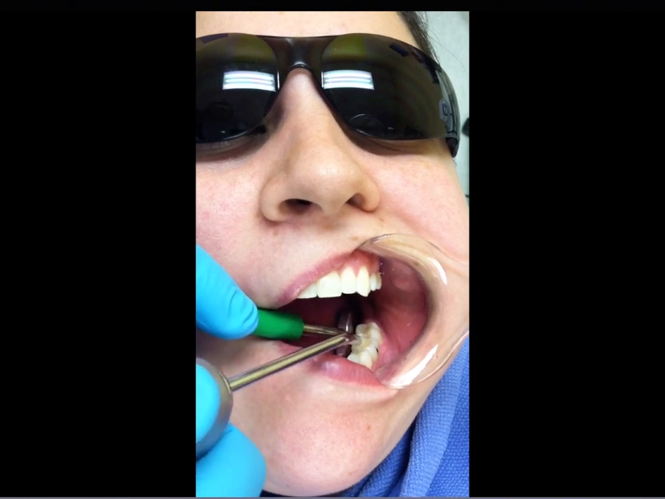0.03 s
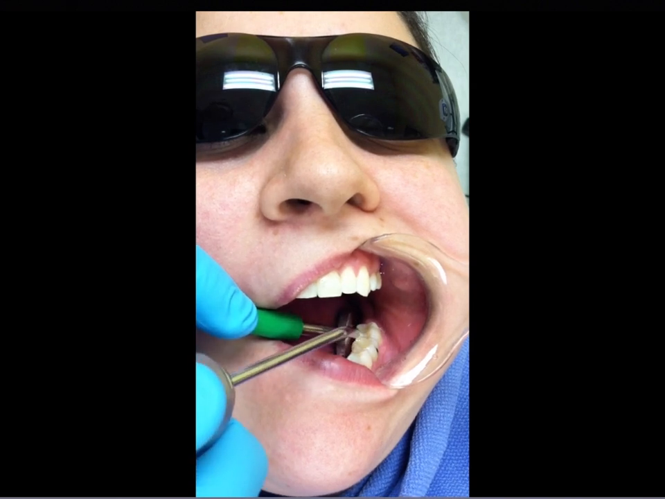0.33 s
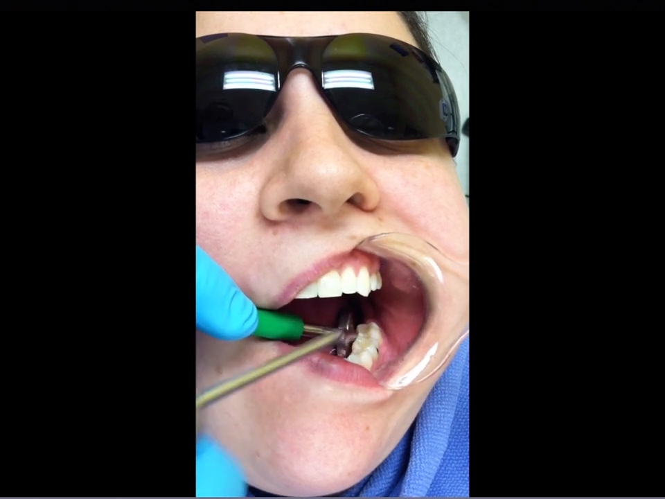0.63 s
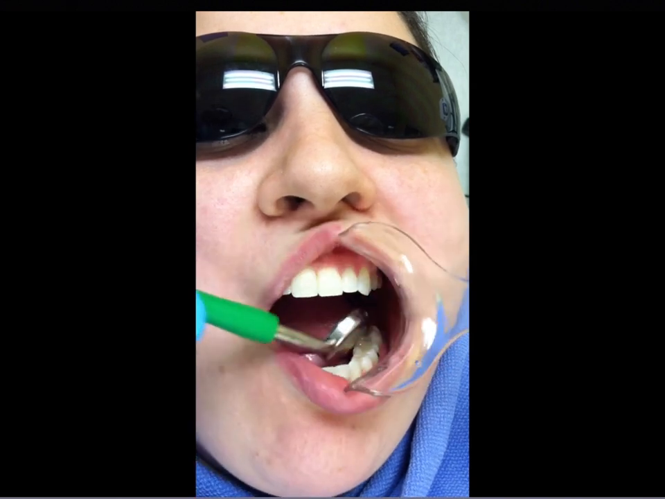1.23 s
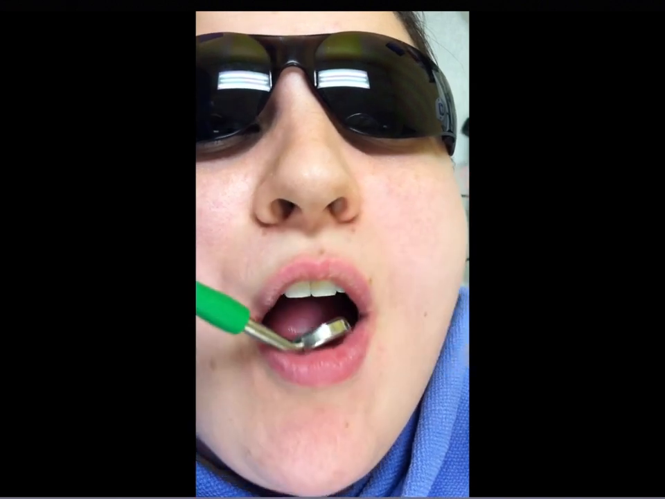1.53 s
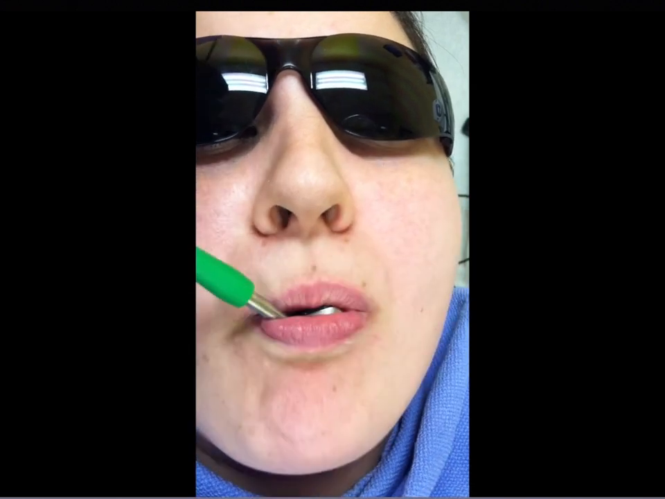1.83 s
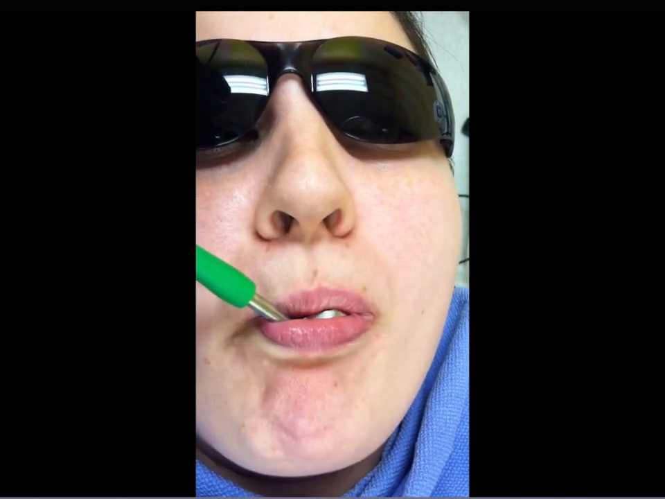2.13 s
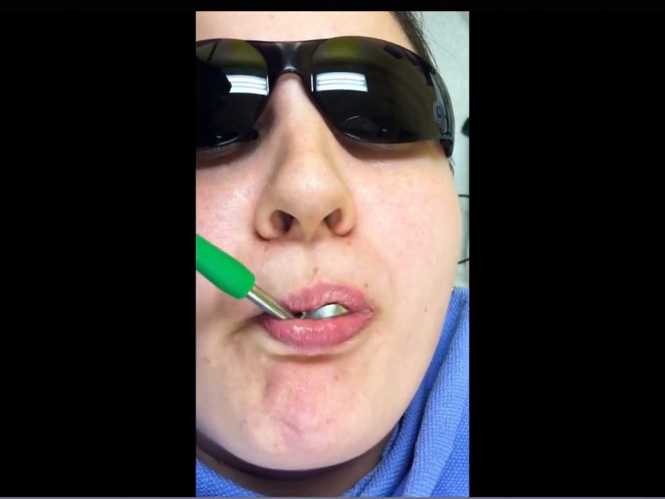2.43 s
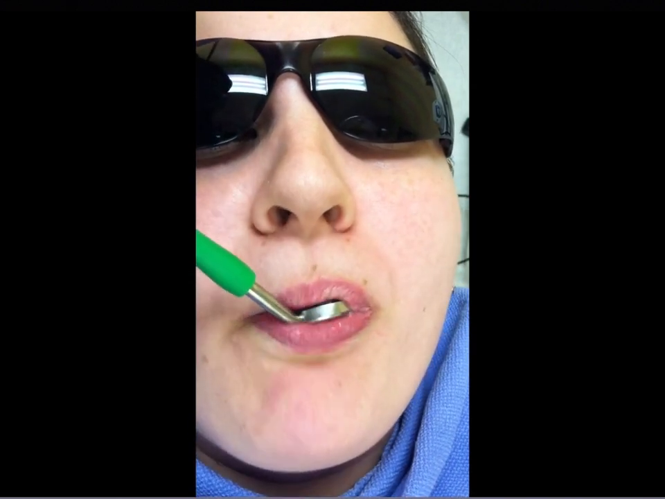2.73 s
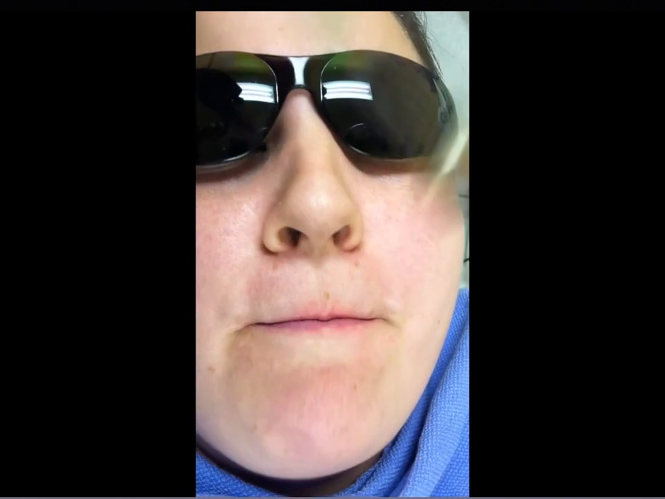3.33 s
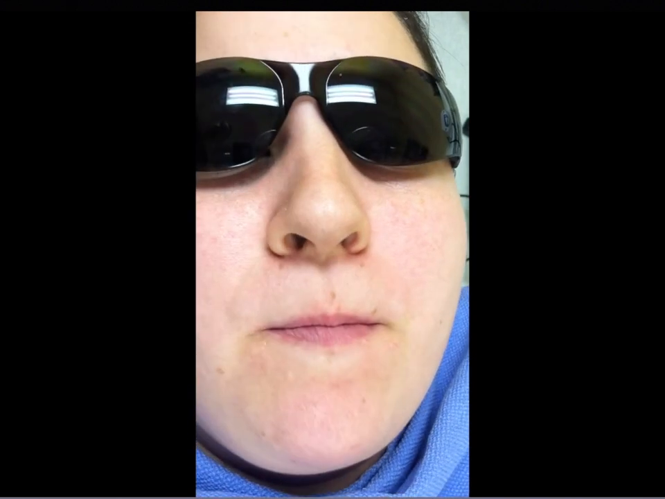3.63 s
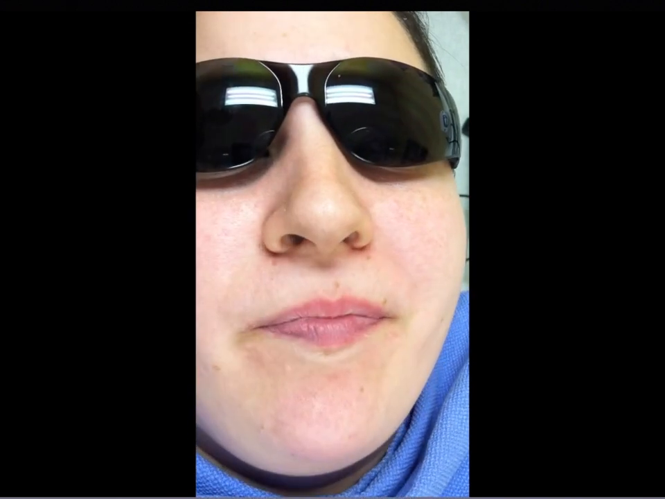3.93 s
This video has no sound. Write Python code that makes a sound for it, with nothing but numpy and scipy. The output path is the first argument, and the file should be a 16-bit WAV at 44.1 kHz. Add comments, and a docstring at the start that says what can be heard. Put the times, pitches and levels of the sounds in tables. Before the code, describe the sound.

A dental suction tip hisses in a mouth, chokes as lips close, then bursts free.

```python
"""Dental suction tip

A suction tip hisses in an open mouth, close by in a small room; at first an air jet blows with it.
The lips close on the tip: the resonances slide down, the flow chokes to leaks, bubbles and a thin
whistle. The seal breaks with a wet burst, and the tip is drawn away to hiss in free air over mains hum."""
import sys
import numpy as np
from scipy import signal
from scipy.fft import rfft, irfft
from scipy.io import wavfile
from scipy.ndimage import uniform_filter1d

SR = 44100
rng = np.random.default_rng(int(sys.argv[2]) if len(sys.argv) > 2 else 0)


def master_out(mix):
    """Clip the mix to full scale and print it as 16-bit PCM to the path in sys.argv[1]."""
    frames = np.transpose(np.atleast_2d(mix))
    ceiling = np.clip(frames, -1, 1)
    pcm = np.round(ceiling * 32767).astype(np.int16)
    wavfile.write(sys.argv[1], SR, pcm)


N = 176400
T = np.arange(N) / SR
FREQS = np.fft.rfftfreq(N, 1 / SR)


def amp(db):
    """Decibels to gain."""
    return 10 ** (np.asarray(db) / 20)


def unit(x):
    """Scales to rms 1."""
    return x / np.sqrt(np.mean(x ** 2) + 1e-20)


def envelope(rows, gate_s=0.0014):
    """Gain from rows of time_s, .., level_db; at either end a gap opens or shuts over gate_s."""
    rows = np.array(rows)
    outside_s = abs(T - np.clip(T, rows[0, 0], rows[-1, 0]))
    gate = np.exp(-np.minimum(outside_s / gate_s, 20))
    return amp(np.interp(T, rows[:, 0], rows[:, -1])) * gate


def pitch(track):
    """Glide from rows of time_s, pitch_hz, level_db."""
    return np.interp(T, *np.transpose(track)[:2])


def wander(rate_hz):
    """Smooth random motion of rms 1, up to the given rate."""
    return unit(irfft(rfft(rng.standard_normal(N)) / (1 + (FREQS / rate_hz) ** 4), N))


def hiss(curve, tone, flutter_db=1., flutter_hz=80):
    """Turbulent air of one colour, fluttering as it drags saliva along."""
    hz, db = np.transpose(tone)
    colour = amp(np.interp(np.log(FREQS + 1), np.log(hz), db))
    colour /= 1 + (hz[0] / 2 / (FREQS + 1)) ** 2  # low cut
    noise = irfft(rfft(rng.standard_normal(N)) * colour, N)
    return envelope(curve) * unit(noise * amp(flutter_db * wander(flutter_hz)))


def resonance(track, width_hz, order=1):
    """Turbulence ringing in a cavity whose centre moves; order multiplies centre and width."""
    pole = np.exp(-np.pi * width_hz * order / SR)
    noise = rng.standard_normal(N) + 1j * rng.standard_normal(N)
    band = signal.lfilter([1], [1, -2 * pole, pole * pole], noise)
    carrier = np.exp(2j * np.pi * order * np.cumsum(pitch(track)) / SR)
    return envelope(track) * unit((band * carrier).real)


def ping(hz, decay_s):
    """A short ring with a soft attack."""
    t = T[:2000]
    shape = (1 - np.exp(-t / (decay_s / 2))) ** 2 * np.exp(-t / decay_s)
    return shape / shape.max() * np.sin(2 * np.pi * hz * t)


def droplets(curve, span_hz, per_s, decay_s):
    """Little bubbles ringing at random times, on 20 pitches across a range."""
    out = np.zeros(N)
    for hz in np.geomspace(*span_hz, 20):
        starts = (rng.random(N) < per_s / 20 / SR) * rng.uniform(.5, 1, N)
        out += signal.oaconvolve(starts, ping(hz, decay_s))[:N]
    return envelope(curve) * unit(out)


def add(mix, start_s, sound):
    """Drops a sound into the mix."""
    part = mix[max(round(start_s * SR), 0):][:len(sound)]
    part += sound[:len(part)]


# Mouth resonances stirred by the flow, and the closing lips' slurp: time_s, centre_hz, level_db
MOUTH_LOW = [(0, 1359, -38), (.6, 1361, -38), (1.08, 1329, -40.5), (1.46, 1265, -45.5), (1.57, 1447, -40.5),
             (1.69, 1383, -37.5), (1.765, 1440, -54)]
MOUTH_MID = [(0, 3223, -39), (.8, 3296, -40), (.9, 3223, -40.5), (1.1, 3187, -42.5), (1.2, 3225, -44.5),
             (1.26, 3450, -47), (1.47, 3487, -42.5), (1.6, 3420, -58.5)]
MOUTH_TEETH = [(0, 3740, -36.5), (.41, 3780, -30.5), (.45, 3710, -41.5), (.8, 3715, -40), (.9, 3982, -47.5),
               (1.4, 3990, -58)]
MOUTH_HIGH = [(0, 4610, -54), (.58, 4630, -36.5), (.84, 4660, -42.5), (1.45, 4540, -62)]
MOUTH_TOP = [(0, 5347, -41), (.41, 5370, -29.5), (.46, 5350, -42), (.95, 5380, -43.5), (1.17, 5160, -47.5),
             (1.33, 5560, -46.5), (1.45, 5330, -53.5), (1.625, 5600, -54), (1.652, 5200, -45),
             (1.7, 3600, -57)]
MOUTH_EDGE = [(.75, 8810, -58), (.85, 8450, -43.5), (.95, 7620, -49.5), (1.06, 7030, -42.5),
              (1.13, 6600, -46), (1.24, 6350, -59), (1.35, 6240, -45), (1.41, 6510, -60), (1.48, 6756, -52),
              (1.62, 6400, -51)]
MOUTH_AIR = [(1.05, 8300, -54), (1.35, 7750, -55.5), (1.5, 8350, -50), (1.62, 8500, -69), (1.65, 8030, -44),
             (1.675, 7600, -51)]
SLURP = [(1.61, 3200, -56), (1.645, 2943, -42), (1.69, 2610, -39), (1.712, 1953, -36), (1.738, 1710, -34.5),
         (1.76, 1427, -44)]
# Suction hiss, and spray as the lips meet: time_s, level_db
SUCTION = [(0, -45.5), (.8, -49), (.92, -48.5), (1.25, -50), (1.57, -49.5), (1.64, -46), (1.69, -55),
           (1.76, -56), (1.82, -73)]
SPIT = [(1.703, -44), (1.712, -41.5), (1.74, -49), (1.8, -64)]
# Their colours: freq_hz, gain_db
SUCTION_TONE = [(1200, -26), (2400, -22), (3200, 0.5), (4600, -2), (6000, 4), (8000, 5), (10500, -2.5),
                (11300, -8), (12800, -11), (15700, -30)]
SPIT_TONE = [(5500, -27), (7800, 6), (9300, -1), (11000, -9), (15500, -8.5)]

def open_mouth():
    """The flow rings the mouth, one sputter shaking all its resonances; it closes with a wet slurp."""
    cavity = (resonance(MOUTH_LOW, width_hz=290) + resonance(MOUTH_MID, width_hz=308)
              + resonance(MOUTH_TEETH, width_hz=440) + resonance(MOUTH_HIGH, width_hz=550)
              + resonance(MOUTH_TOP, width_hz=630) + resonance(MOUTH_EDGE, width_hz=1300)
              + resonance(MOUTH_AIR, width_hz=860))
    cavity *= amp(1.5 * wander(112))  # sputter
    slurp = resonance(SLURP, width_hz=570) * amp(1.66 * wander(260))
    suction = moving_surfaces(hiss(SUCTION, SUCTION_TONE))
    spit = hiss(SPIT, SPIT_TONE, flutter_db=4.0, flutter_hz=260)
    return cavity + slurp + suction + spit


# Hiss bands slide down as the mouth widens and up as it narrows: time_s, shift_hz
BAND_SLIDE = [(.8, 0), (1.25, -2600), (1.65, 1400), (2.8, 1402), (3.45, -3800)]

def moving_surfaces(x, depth_db=3.5):
    """Tongue, cheek and mirror move near the tip: irregular bands of the hiss swell, slide and fade."""
    hz, t, spectrum = signal.stft(x, SR, nperseg=512)
    patches = rng.standard_normal(spectrum.shape)
    for _ in range(2):  # blur across frequency and time
        patches = uniform_filter1d(uniform_filter1d(patches, size=5, axis=0), size=20, axis=1)
    band = (hz[:, None] - np.interp(t, *np.transpose(BAND_SLIDE))) / hz[1]
    patches = np.take_along_axis(patches, np.round(band).astype(int) % len(hz), axis=0)
    return signal.istft(spectrum * amp(depth_db * np.tanh(unit(patches))))[1][:N]


# The jet's swell: time_s, level_db
JET = [(0, -42), (.025, -35), (.045, -27), (.14, -25), (.21, -29.5), (.32, -25.5), (.412, -24.5),
       (.428, -29.5), (.44, -39.5), (.8, -40), (.95, -57)]
# Its colour: freq_hz, gain_db
JET_TONE = [(1000, -20), (1600, -4.5), (2300, -15), (2800, -8.5), (3150, 0.5), (3800, -3), (4250, -14.5),
            (4550, 3.5), (4950, -3.5), (5350, -3), (6000, -4), (6650, -18), (6950, -5), (7300, -8),
            (8100, 0), (9100, -4.5), (14500, -17), (15700, -32.5)]

def air_jet():
    """A turbulent jet: full blast, then a weak flow until it is withdrawn."""
    return hiss(JET, JET_TONE, flutter_db=0.65)


# Resonances of the choked flow: time_s, centre_hz, level_db
SQUEAK = [(1.87, 5070, -61), (1.88, 4930, -50.5), (1.9, 4340, -60), (1.925, 4200, -55.5)]
SEEP = [(1.96, 4310, -56.5), (2.11, 4720, -60), (2.16, 4650, -67)]
GURGLE = [(1.79, 451.7, -50.5), (1.84, 497, -50.5), (1.88, 446, -54.5), (1.94, 385, -70)]
# Hissing gaps and bubbling saliva: time_s, level_db
LEAK = [(1.955, -63.5), (2.13, -65), (2.16, -78), (2.396, -74), (2.401, -59), (2.46, -52), (2.52, -50.5),
        (2.54, -84), (2.61, -69), (2.65, -51)]
SLIT = [(2.43, -70), (2.465, -48), (2.52, -44.5), (2.6, -43.5), (2.632, -42), (2.65, -74)]
BUBBLING = [(2.13, -77), (2.165, -58), (2.205, -63), (2.24, -57.5), (2.29, -62.5), (2.36, -62), (2.4, -64)]
# The slit's colour: freq_hz, gain_db
SLIT_TONE = [(1500, -19), (3400, -22), (4200, 0.5), (5400, 1.5), (7000, 2.5), (7600, -10), (8500, -39),
             (12000, -48)]

def sealed_lips():
    """Air squeezes through small gaps and bubbles through saliva."""
    squeaks = resonance(SQUEAK, width_hz=880) + resonance(SEEP, width_hz=980)
    leaks = hiss(LEAK, SUCTION_TONE) + hiss(SLIT, SLIT_TONE)
    bubbles = droplets(BUBBLING, span_hz=(1030, 2130), per_s=420, decay_s=0.0022)
    gurgle = resonance(GURGLE, width_hz=240) * amp(wander(120))
    return squeaks + leaks + bubbles + gurgle


# Lip whistles, one glide each: time_s, pitch_hz, level_db
WHISTLES = [
    [(2.4, 4340, -53), (2.418, 3550, -50), (2.43, 3100, -41.5), (2.447, 2800, -39), (2.46, 2550, -47.5),
     (2.486, 2460, -45)],
    [(2.626, 2850, -53), (2.639, 2600, -47), (2.645, 3080, -47)],
]
# Their harmonics, fundamental first: gain_db
HARMONICS_DB = [-1, -8, -15.5]

def whistle(track):
    """A gap between lip and tip whistles, falling as it widens."""
    wavering_hz = pitch(track) * (1 + 0.021 * wander(460))
    phase = 2 * np.pi * np.cumsum(wavering_hz) / SR
    tone = sum(amp(db) * np.sin(k * phase) for k, db in enumerate(HARMONICS_DB, 1))
    return envelope(track) * unit(tone)


# Resonances of the reopening mouth: time_s, centre_hz, level_db
REOPEN_LOW = [(2.76, 1710, -49), (2.82, 1610, -46), (2.9, 1468, -43.5), (3.03, 1242, -49.5),
              (3.3, 1205, -72)]
REOPEN_MID = [(2.652, 3030, -34), (2.69, 2980, -37.5), (2.735, 3280, -36.5), (2.755, 3400, -36.5),
              (2.775, 2945, -48), (2.82, 2895, -46), (2.92, 3100, -45), (3.06, 3070, -55)]
REOPEN_HIGH = [(2.8, 4300, -57), (3.1, 3990, -63)]
REOPEN_TOP = [(2.8, 6000, -55), (2.95, 5950, -48), (3.05, 5350, -50), (3.18, 4860, -56)]
REOPEN_EDGE = [(2.78, 8260, -47), (2.86, 7900, -42), (2.93, 7430, -45.5), (3.05, 6750, -58),
               (3.18, 5940, -54)]
# The burst, and droplets torn off after it: time_s, level_db
BURST = [(2.6515, -32), (2.72, -34.5), (2.79, -40.5), (2.81, -41), (2.9, -77)]
CRACKLE = [(2.69, -47), (2.79, -43), (2.95, -65)]
# The burst's colour: freq_hz, gain_db
BURST_TONE = [(180, -4), (900, -22), (1200, -2.5), (2300, 2), (3800, 4), (4500, -1), (6700, -9.5),
              (7800, -2.5), (10500, -14.5), (13000, -18), (15700, -32)]

def seal_break():
    """The seal bursts in a wet, crackling spray and the mouth rings as it reopens."""
    cavity = (resonance(REOPEN_LOW, width_hz=470) + resonance(REOPEN_MID, width_hz=610)
              + resonance(REOPEN_HIGH, width_hz=250) + resonance(REOPEN_TOP, width_hz=580)
              + resonance(REOPEN_EDGE, width_hz=1200))
    spray = (cavity + hiss(BURST, BURST_TONE, flutter_hz=490)) * amp(wander(170))
    return spray + droplets(CRACKLE, span_hz=(2400, 8000), per_s=170, decay_s=0.00015)


# The tube's resonance: time_s, centre_hz, level_db
TUBE = [(3.05, 753, -71), (3.2, 774, -58.5), (3.64, 782, -60.5), (3.76, 814, -60.5), (4, 832, -63)]
# Hiss in free air: time_s, level_db
FREE_AIR = [(2.7, -45), (2.85, -50), (3.08, -45.5), (3.13, -44.5), (3.28, -42), (3.42, -46), (3.72, -47.5),
            (4, -47.5)]
# Its colour: freq_hz, gain_db
FREE_AIR_TONE = [(450, -12), (650, -6.5), (1700, -6), (2750, -3), (3700, 4), (4800, 1), (6500, 5.5),
                 (7600, -1.5), (8500, -1), (10100, -11), (12600, -19), (15500, -38)]

def free_tip():
    """The tip hisses on in free air, its tube ringing faintly on the first and third harmonics."""
    tube = resonance(TUBE, width_hz=43) + amp(-6.5) * resonance(TUBE, width_hz=74, order=3)
    return tube + moving_surfaces(hiss(FREE_AIR, FREE_AIR_TONE))


# Body under the hiss: time_s, level_db
RUSH = [(0, -52.5), (1.7, -53.5), (1.77, -79), (2.64, -73), (2.67, -48), (3.3, -55.5), (4, -69)]
# Its colour: freq_hz, gain_db
RUSH_TONE = [(100, -12), (450, -2.5), (600, 4.5), (1000, -2.5), (1650, -1.5), (2300, -5.5), (5000, -43)]

def air_rush():
    """A darker rush of air that ducks while the lips are sealed."""
    return hiss(RUSH, RUSH_TONE)


# Saliva pops: time_s, level_db, pitch_hz, decay_s
POPS = [(0.5939, -17.5, 3600, 0.001), (0.593, -22.5, 1414, 0.0016), (0.815, -31, 3400, 0.0011),
        (1.2747, -28, 1340, 0.0018), (1.7122, -15.5, 1810, 0.0027), (1.756, -27.5, 1420, 0.0018),
        (2.2595, -46, 8500, .0001), (2.349, -51, 11000, .0001), (2.766, -23, 2970, 0.00055),
        (2.782, -24.5, 2760, 0.0006), (3.129, -19, 4030, 0.00013), (3.554, -48, 1380, 0.0064)]

def saliva_pops():
    """Drops pop into the tip, each with one short ring."""
    out = np.zeros(N)
    for time_s, db, hz, decay_s in POPS:
        add(out, time_s - decay_s / 4, amp(db) * ping(hz, decay_s))
    return out


# Two hits: start_s, level_db
KNOCKS = [(3.4374, -29.5), (3.4492, -37)]
# Their modes: pitch_hz, gain_db, decay_s
KNOCK_MODES = [(318, -9, 0.0042), (740, -2.5, 0.002), (1190, -7.5, 0.0036), (1520, -1, 0.0017),
               (2360, -13, 0.002)]

def knock():
    """A dull knock and its rebound ring the same damped modes."""
    out = np.zeros(N)
    ring = sum(amp(db) * ping(hz, decay_s) for hz, db, decay_s in KNOCK_MODES)
    for start_s, db in KNOCKS:
        add(out, start_s, amp(db) * ring)
    return out


# Mains partials: pitch_hz, level_db
HUM = [(60, -60), (120, -62.5), (240, -71)]
# Handling rustle: time_s, level_db
HANDLING = [(.95, -73), (1.07, -52.5), (1.18, -50), (1.3, -60), (1.42, -51), (1.55, -61.5), (1.81, -55.5),
            (1.95, -67.5), (3.2, -59.5), (3.5, -79)]
# Colours of the rustle and the room air: freq_hz, gain_db
HANDLING_TONE = [(50, -18), (170, 1.5), (260, -3.5), (450, -26), (1200, -54)]
ROOM_TONE = [(20, -9.5), (80, 0.5), (150, 2.5), (250, -3), (450, -10.5), (900, -13), (7000, -20),
             (10000, -48)]

def background(air_db=-57.5):
    """A bed of mains hum, room air and the low rustle of handling."""
    hum = sum(amp(db) * np.sqrt(2) * np.sin(2 * np.pi * (hz * T + rng.random())) for hz, db in HUM)
    room_air = hiss([(0, air_db), (N / SR, air_db)], ROOM_TONE, flutter_db=1.5)
    return hum + room_air + hiss(HANDLING, HANDLING_TONE)


def room(x, wet_db=-14, t60_s=0.2):
    """Near walls add a short tail after 4 ms."""
    t = T[:SR // 3]
    tail = rng.standard_normal(len(t)) * amp(-60 * t / t60_s) * (t > .004)
    return x + amp(wet_db) * signal.oaconvolve(x, tail / np.linalg.norm(tail))[:N]


def scene():
    """Air noises and small hits in the room, over the bed, in mono."""
    air = open_mouth() + air_jet() + sealed_lips() + sum(whistle(track) for track in WHISTLES)
    air += seal_break() + free_tip() + air_rush()
    return (room(air + saliva_pops() + knock()) + background())[None]


def record(dry):
    """A steep low-pass trims the top of the hiss."""
    cutoff_hz = 15720
    lowpass = signal.firwin(511, cutoff_hz, window=("kaiser", 9), fs=SR)
    return signal.oaconvolve(dry, lowpass[None], "same")


dry = scene()
out = record(dry)
master_out(out)
```